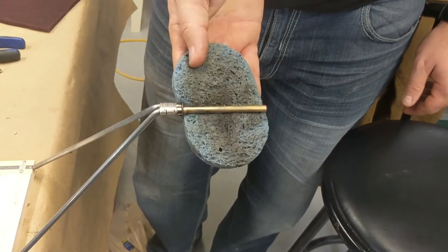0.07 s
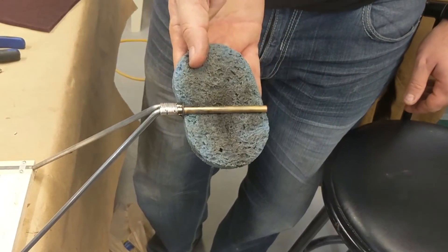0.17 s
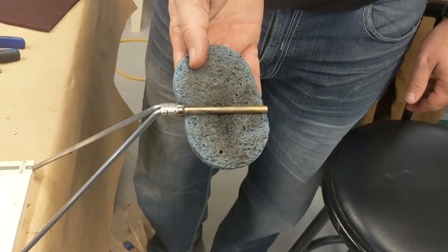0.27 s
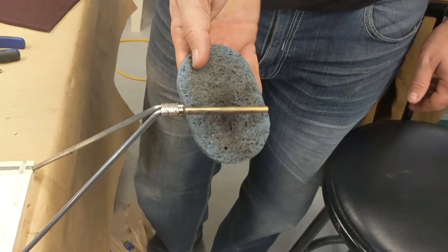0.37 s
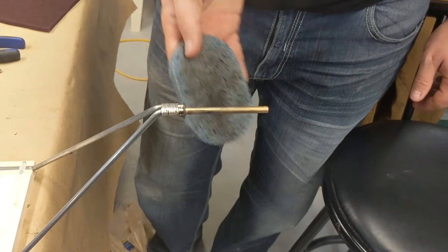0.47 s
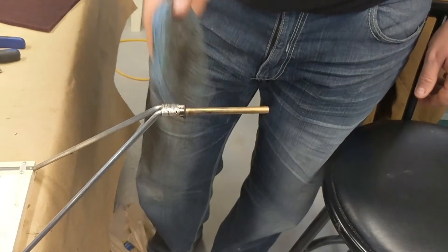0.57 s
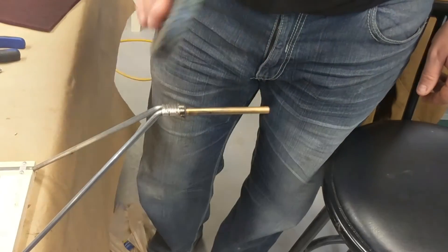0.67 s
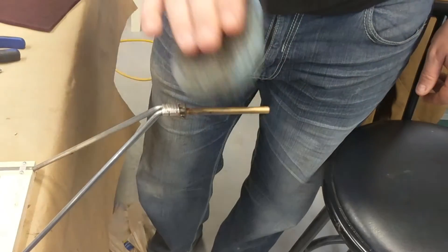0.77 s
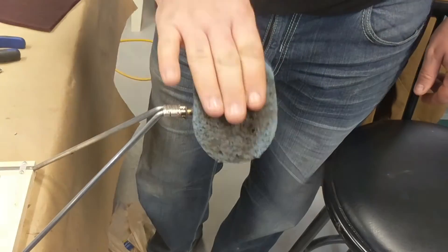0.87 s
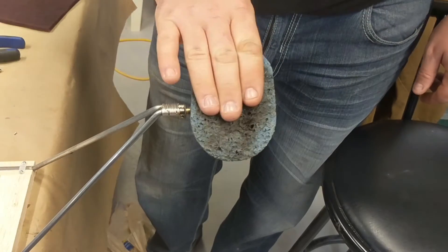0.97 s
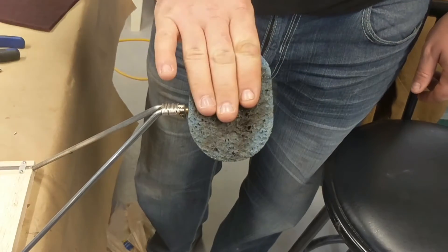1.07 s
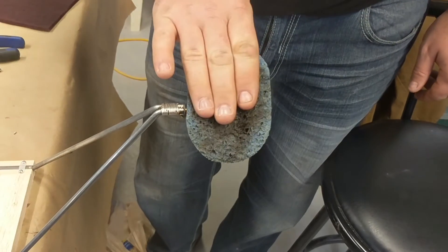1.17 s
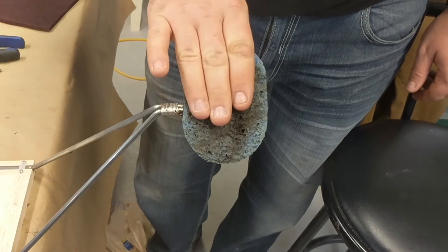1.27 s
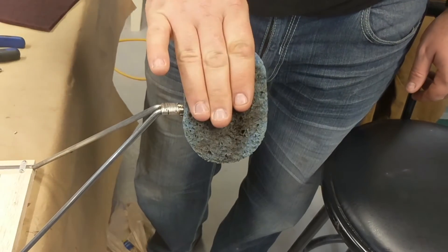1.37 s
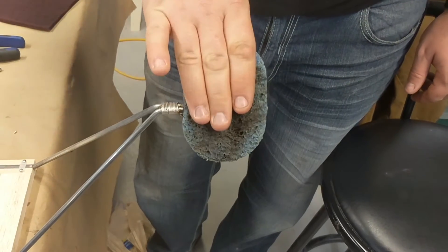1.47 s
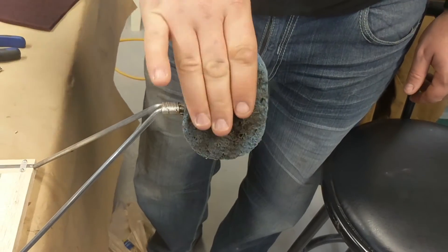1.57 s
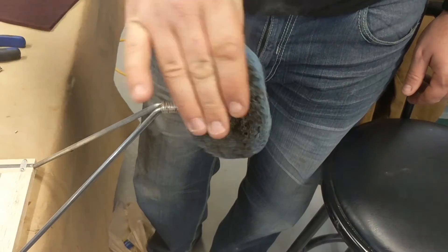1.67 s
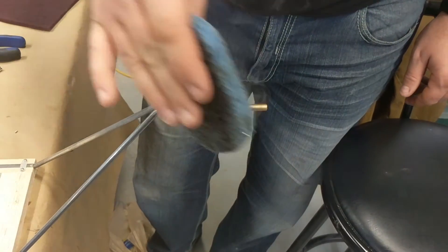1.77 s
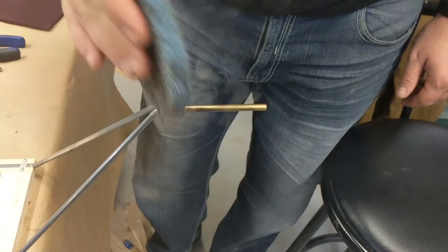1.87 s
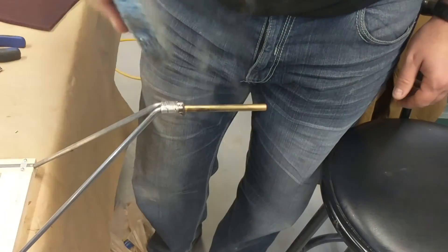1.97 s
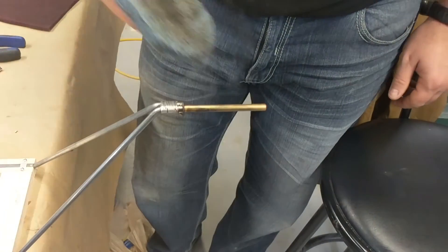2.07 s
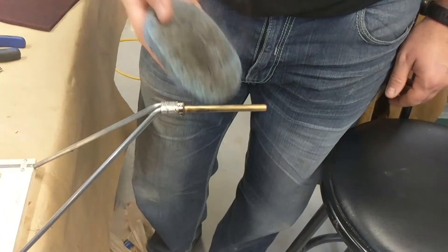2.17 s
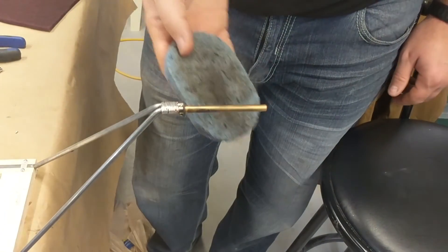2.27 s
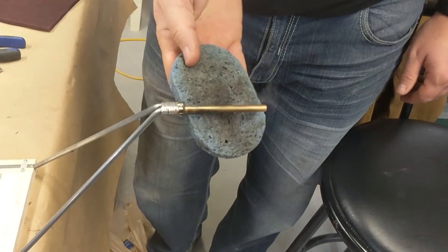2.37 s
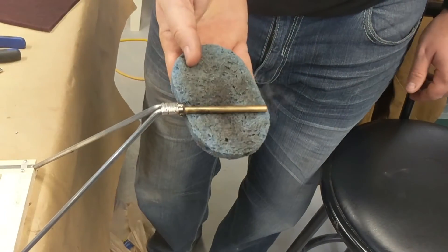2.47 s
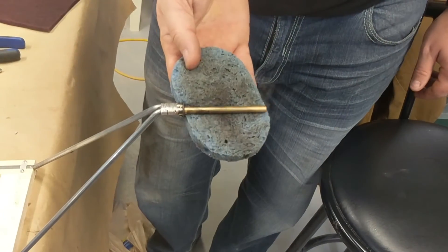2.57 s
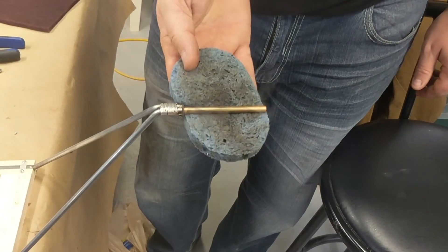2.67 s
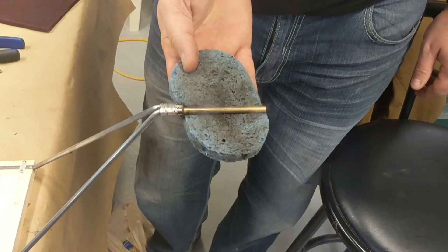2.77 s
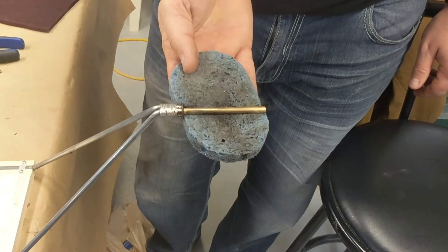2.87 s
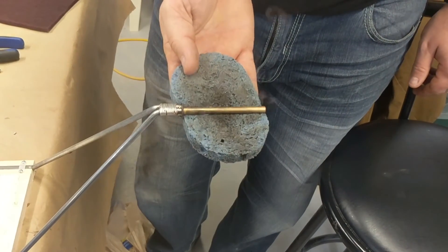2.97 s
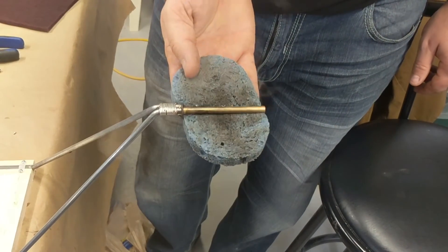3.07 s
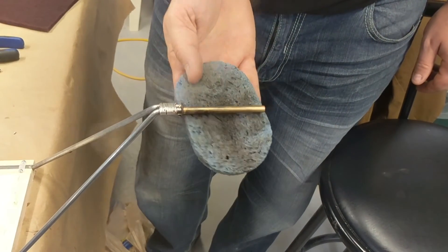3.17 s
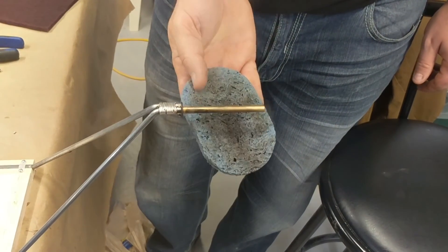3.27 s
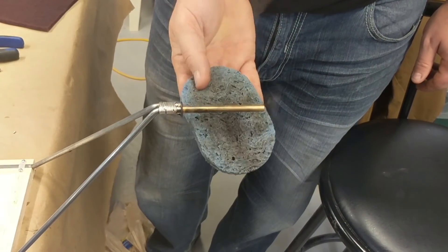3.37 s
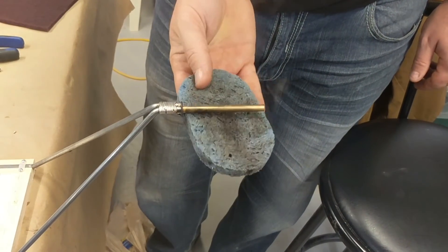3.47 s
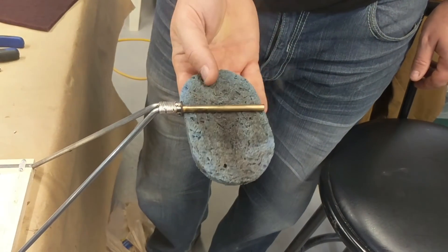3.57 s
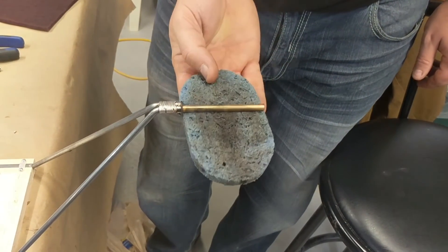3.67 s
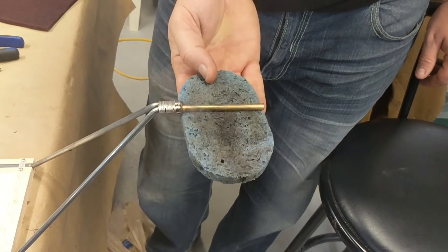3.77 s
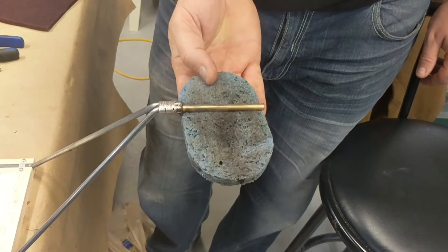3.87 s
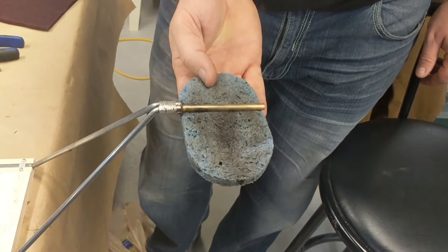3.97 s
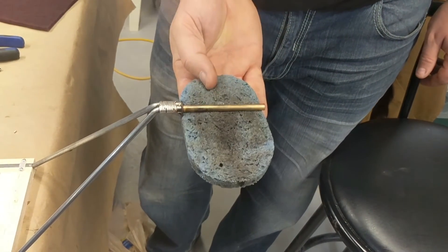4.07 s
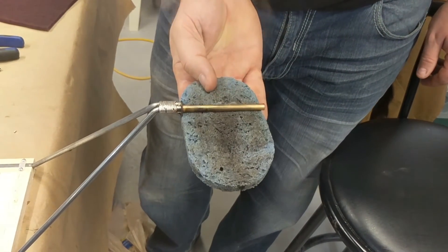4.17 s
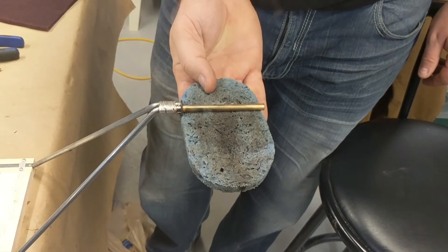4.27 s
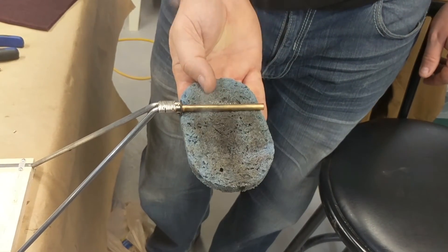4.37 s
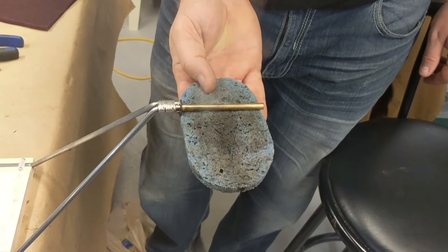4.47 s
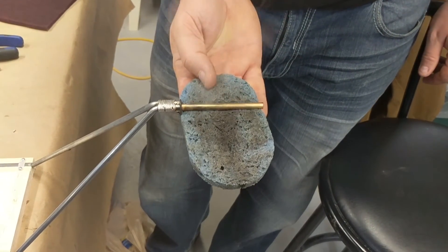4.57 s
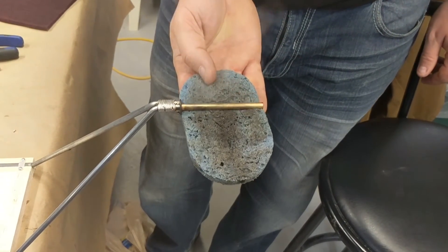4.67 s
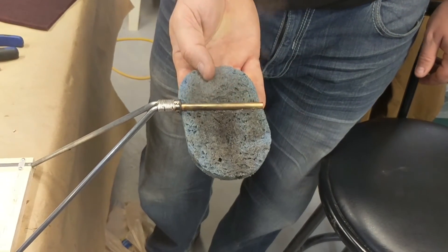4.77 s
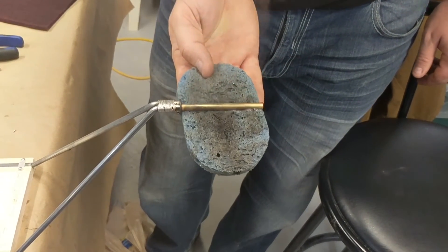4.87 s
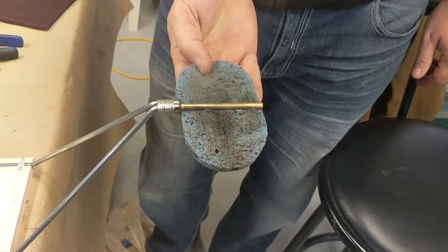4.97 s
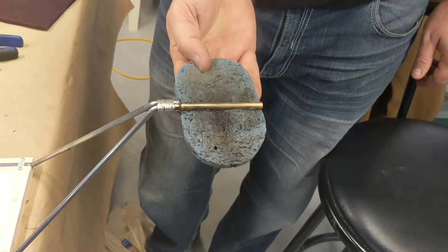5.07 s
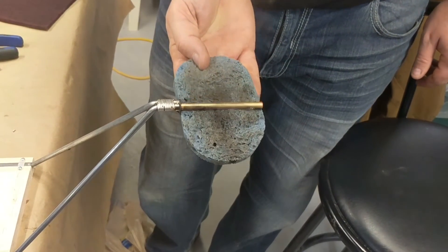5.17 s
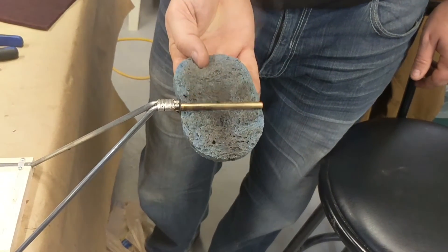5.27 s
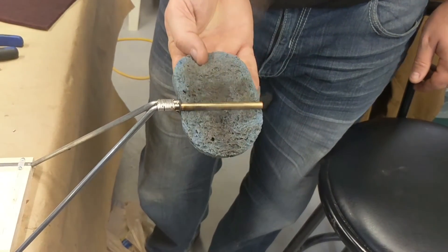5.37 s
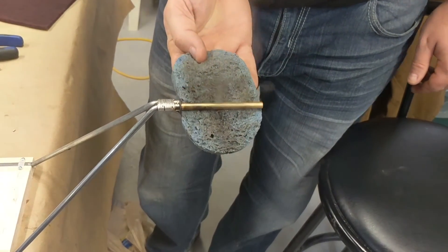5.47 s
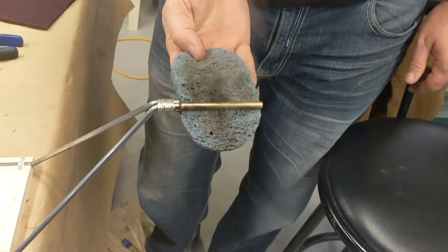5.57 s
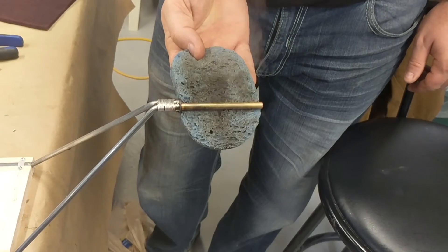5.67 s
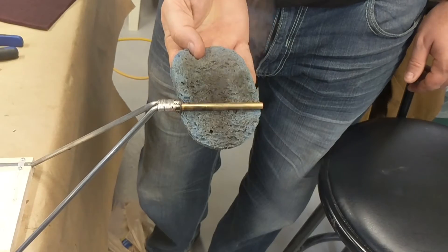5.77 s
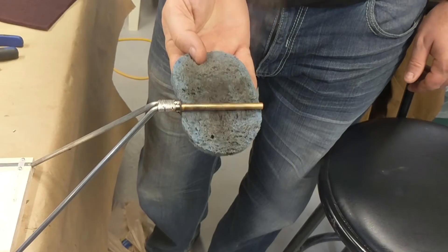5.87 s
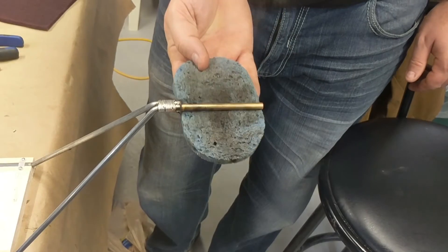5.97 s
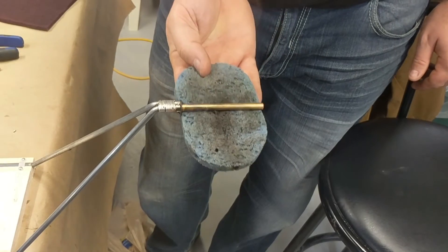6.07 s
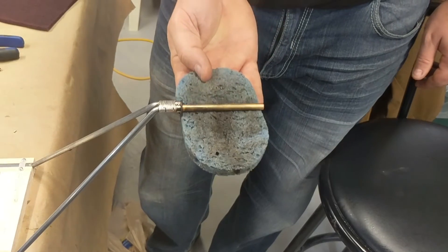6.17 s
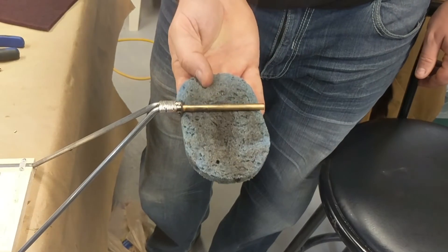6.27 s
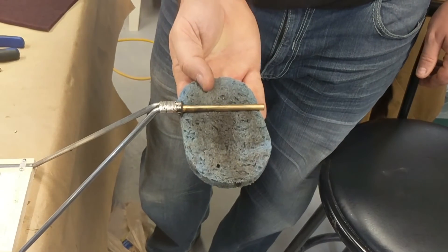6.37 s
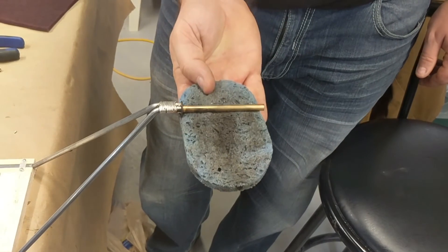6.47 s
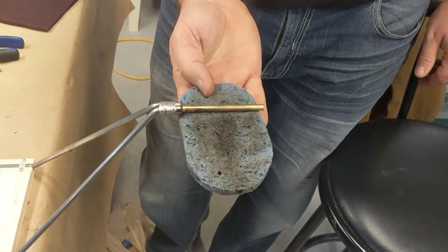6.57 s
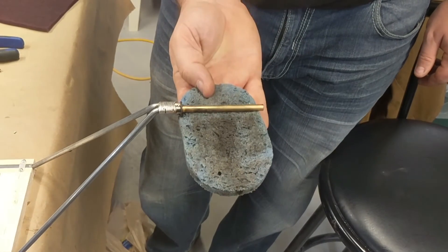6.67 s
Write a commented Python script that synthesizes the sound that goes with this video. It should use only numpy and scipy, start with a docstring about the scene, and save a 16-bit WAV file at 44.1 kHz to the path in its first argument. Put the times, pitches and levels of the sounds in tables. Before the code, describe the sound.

Water fizzes and spits on hot metal in four presses of a damp sponge, the last one longest, with soft handling between.

```python
"""Wet sponge on hot brass

A wet sponge is held four times to a hot brass tube: from below, from above, then twice from below.
Water flashes into a fizz of bursting bubbles and a softer rush of steam; single drops spit.
Between the presses the hand moves about and last drops tick on the tube, over a workshop's rumble."""
import sys
import numpy as np
from scipy import signal
from scipy.fft import rfft, irfft, next_fast_len
from scipy.io import wavfile
from scipy.ndimage import uniform_filter1d

SR = 44100
rng = np.random.default_rng(int(sys.argv[2]) if len(sys.argv) > 2 else 0)


def wav_record(signal):
    """Record a signal, one row per channel, as 16-bit PCM in the file named by sys.argv[1]."""
    frames = np.transpose(np.atleast_2d(signal))
    bounded = np.clip(frames, -1, 1)
    # unit amplitude maps onto the largest positive 16-bit level
    quanta = np.round(bounded * 32767).astype(np.int16)
    wavfile.write(sys.argv[1], SR, quanta)


N = 296969
TIME = np.arange(N) / SR


def gain_of(db):
    """Amplitude ratio of a level in decibels."""
    return 10 ** (np.asarray(db) / 20)


def unit_rms(x):
    """Normalisation to unit mean power."""
    return x / np.sqrt(np.mean(x ** 2) + 1e-20)


def at_frequency(points, hz):
    """Linear interpolation on a logarithmic frequency axis."""
    point_hz, value = np.transpose(points)
    return np.interp(np.log(hz + 1), np.log(point_hz + 1), value)


def at_time(rows, t, column=1):
    """Linear interpolation of one column in time."""
    rows = np.array(rows)
    return np.interp(t, rows[:, 0], rows[:, column])


def colour(x, spectrum):
    """Spectral shaping of a steady sound, returned at rms 1."""
    size = next_fast_len(N)
    response = gain_of(at_frequency(spectrum, np.fft.rfftfreq(size, 1 / SR)))
    return unit_rms(irfft(rfft(x, size) * response, size)[:N])


def resonance(hz, centre_hz, width_hz, peak_db):
    """A resonance as a Lorentzian peak on the decibel scale."""
    return peak_db / (1 + (2 * (hz - centre_hz) / width_hz) ** 2)


def wander(per_s):
    """Random modulation of rms 1 that takes per_s new values a second."""
    return unit_rms(np.interp(TIME * per_s, np.arange(8192), rng.standard_normal(8192)))


def swells(rows):
    """Superposition of Gaussian pulses."""
    return sum(height * np.exp(-((TIME - time_s) / half_s) ** 2) for time_s, half_s, height in rows)


# Standing waves of the workshop: centre_hz, width_hz, peak_db
ROOM_MODES = [(57.5, 6.1, 9), (69, 7.9, 7), (89.6, 11, 3.5), (112.2, 3.4, 11), (140.2, 6.4, -2.5),
              (144.7, 14.3, 9.5), (161, 5.3, -2.5), (193, 13, 1.5), (210, 13, 4), (238.6, 6.7, 7.5),
              (294, 8.5, 10), (305.6, 5.2, 12.5), (330.6, 3.8, 12), (500, 8, 4), (553, 4.9, 9.5)]
# Spectrum of the ventilation: frequency_hz, relative_db
RUMBLE_SPECTRUM = [(20, -41), (42, -14), (60, -3.5), (100, -6.5), (145, -3.5), (180, -6.5), (230, -12),
                   (300, -20.5), (380, -23), (520, -24), (1200, -28.5), (3000, -36.5), (7000, -43.5),
                   (16000, -44)]


def ventilation(level_db=-48.5):
    """Forced vibration: low ventilation noise keeps the modes of the room ringing."""
    size = next_fast_len(N)
    hz = np.fft.rfftfreq(size, 1 / SR)
    modes_db = sum(resonance(hz, *mode) for mode in ROOM_MODES)
    drone = irfft(rfft(rng.standard_normal(size)) * gain_of(modes_db))
    return gain_of(level_db) * colour(drone[:N], RUMBLE_SPECTRUM)


# Contacts of sponge and tube; the press from above has two rows, a light rest and a push:
# start_s, end_s, closing_s, lifting_s, boil_db, boil_db_per_s, steam_ratio_db, ratio_db_per_s
PRESSES = [(-.05, 0.354, .03, 0.081, -41.5, -9.5, -9.5, -4.5),
           (0.816, 2.004, 0.25, 0.53, -46.5, 0, -7.5, -0.5), (1.21, 1.71, 0.051, 0.18, -51, 4, -19.5, 17),
           (2.402, 3.221, 0.035, 0.054, -38, -2.5, -10.5, -3),
           (3.487, 6.9, 0.17, .06, -37.5, -0.04, -12, 1.5)]
# The hand squeezes (+) or eases (-): time_s, half_length_s, change_db
SQUEEZES = [(.21, 0.032, 2.8), (1.75, 0.061, -5.5), (2.63, .06, 1), (2.8, .05, -0.5), (3.7, 0.1, 0.5),
            (3.88, 0.068, -1.3), (4.04, 0.054, 0.5), (4.47, 0.042, -0.5), (4.64, 0.067, 1.3),
            (5.08, 0.093, 1.4), (5.48, 0.044, -0.5), (5.94, 0.074, -3.5), (6.17, 0.03, 0.5),
            (6.33, 0.066, 0.9), (6.47, .03, -1.8)]


def pressing(steam_lag_s=0.05, steam_squeeze_share=0.74):
    """Contact heating: the envelopes of boiling and steam follow wetted area and hand pressure."""
    boil, steam = np.zeros((2, N))
    for start, end, closing, lifting, boil_db, boil_slope, ratio_db, ratio_slope in PRESSES:
        age = np.clip(TIME - start, 0, end - start)
        area = np.clip(np.minimum(age / closing, (end - TIME) / lifting), 0, 1)
        level = area * gain_of(boil_db + boil_slope * age)
        boil += level
        steam += level * gain_of(ratio_db + ratio_slope * age) * (1 - np.exp(-age / steam_lag_s))
    squeeze_db = swells(SQUEEZES)
    return boil * gain_of(squeeze_db), steam * gain_of(steam_squeeze_share * squeeze_db)


def bubbles(per_s, spread_db, smooth_share):
    """Shot noise: bursts of uneven size over the smooth hiss of those too small to tell apart."""
    sizes = gain_of(spread_db * np.minimum(rng.exponential(1, N), 5))
    bursts = sizes * rng.choice([-1., 1.], N) * (rng.random(N) < per_s / SR)
    return np.sqrt(1 - smooth_share) * unit_rms(bursts) + np.sqrt(smooth_share) * rng.standard_normal(N)


# Spectra of bursting bubbles and of escaping steam: frequency_hz, relative_db
FIZZ_SPECTRUM = [(1200, -30), (2600, -8), (4000, -6), (5200, -2.5), (7600, -0.5), (9500, -1.5),
                 (11500, -1.5), (13500, 2), (15600, 2.5), (16200, -8)]
STEAM_SPECTRUM = [(250, -37), (500, -8), (750, -7.5), (1000, -3), (1350, -5.5), (1900, 1.5), (2450, 2),
                  (3300, 1.1), (4500, 1.5), (8000, -28)]
# How tightly the sponge closes over the tube: time_s, cover_fraction
COVER = [(.8, 0), (.9, 1), (1.15, 0.46), (1.3, 0.9), (1.6, 1), (1.75, 0.44)]


def boiling(boil, steam, steam_db=-1.2, sputter_db=0.35, surge_db=0.35):
    """Flash boiling: bubbles burst and steam escapes as broadband noise, filtered by the sponge."""
    cover = at_time(COVER, TIME)
    muffled = np.clip(2 * cover, 0, 1)  # the covering sponge swallows the sharp bursts
    crackle = bubbles(per_s=6000, spread_db=3.5, smooth_share=0.64)
    fizz = np.sqrt(1 - muffled) * crackle + np.sqrt(muffled) * rng.standard_normal(N)
    rush = bubbles(per_s=2200, spread_db=3, smooth_share=0.67)
    hiss = boil * colour(fizz, FIZZ_SPECTRUM) + gain_of(steam_db) * steam * colour(rush, STEAM_SPECTRUM)
    hiss *= gain_of(sputter_db * wander(220) + surge_db * wander(35))  # water arrives unevenly
    hz, t, spectra = signal.stft(hiss, SR, nperseg=512, noverlap=384)
    hz = hz[:, None]
    shape_db = bubble_size_db(hz, t, boil, steam) + pores_db(spectra.shape)
    shape_db += hollow_db(hz, at_time(COVER, t)) + gaps_db(hz, t)
    spectra = spectra * gain_of(shape_db) * sponge_reflection(hz, t)
    return signal.istft(spectra, SR, nperseg=512, noverlap=384)[1][:N]


def bubble_size_db(hz, t, boil, steam, coarsening=0.71, neutral_db=-8):
    """Larger bubbles sound lower: more steam coarsens the fizz, drawing it towards 4.5 kHz."""
    steam_ratio_db = 20 * np.log10(np.interp(t, TIME, (steam + 1e-9) / (boil + 1e-9)))
    fineness = np.clip(coarsening * (neutral_db - steam_ratio_db), -3, 3)
    return fineness * at_frequency([(1000, 0.61), (4500, -0.74), (11000, 0.45), (15500, 0.91)], hz)


def pores_db(shape, depth_db=1.2):
    """Random modulation: pores open and close, so patches of the spectrum come and go."""
    slow_noise = uniform_filter1d(rng.standard_normal(shape), size=18, axis=1)
    return depth_db * unit_rms(uniform_filter1d(slow_noise, size=4, axis=0))


# The largest drops that burst on the metal: time_s, relative_db
SPITS = [(.189, -31), (.283, -28), (.317, -31), (.522, -45), (.77, -49), (.878, -31), (2.0, -40),
         (2.175, -43), (2.287, -45), (2.586, -19), (2.671, -19), (2.731, -24), (2.845, -20), (2.895, -22),
         (3.122, -26), (3.25, -46), (3.444, -45), (3.478, -45), (5.279, -19), (5.741, -19), (6.439, -22)]


def spits(boil, large_gain_db=2, small_gain_db=16, small_per_s=26, pitch_hz=12000, decay_s=0.00006):
    """Impulsive sources: a bursting drop is one sharp pressure swing; small ones come at random."""
    bursts = (rng.random(N) < small_per_s / SR) * rng.uniform(0.5, 1, N)
    bursts *= gain_of(small_gain_db) * boil
    for time_s, relative_db in SPITS:
        bursts[round(time_s * SR)] += gain_of(relative_db + large_gain_db)
    t = np.arange(-32, 33) / SR
    swing = np.sin(2 * np.pi * pitch_hz * t) * np.exp(-abs(t) / decay_s)
    return np.convolve(bursts, swing, "same")


# Rubs of hand and sleeve as the sponge is turned over: time_s, half_length_s, relative_db
RUBS = [(0.31, 0.1, -63), (0.593, 0.051, -61), (0.71, 0.022, -56), (0.778, .03, -62.5), (.915, 0.056, -58),
        (1.17, 0.071, -61.5), (1.487, 0.064, -58.5), (1.635, 0.046, -57.5), (1.796, 0.074, -57),
        (1.95, 0.048, -60.5), (2.137, .05, -63.5), (2.367, 0.11, -65), (3.19, .025, -65), (3.51, .06, -68)]
# Spectrum of the rubbing: frequency_hz, relative_db
RUB_SPECTRUM = [(250, -7), (600, 0), (1200, 1), (2200, -4.5), (3500, -13.5), (8000, -17), (16000, -26)]


def handling(gain_db=-2, roughness_db=3.5):
    """Friction noise: skin, cloth and sponge rub in soft, uneven swells."""
    envelope = swells([(time_s, half_s, gain_of(db)) for time_s, half_s, db in RUBS])
    envelope *= gain_of(gain_db + roughness_db * wander(60))
    return envelope * colour(rng.standard_normal(N), RUB_SPECTRUM)


# Fresh water meets the metal: time_s, level_db, decay_s, centre_hz
PUFFS = [(0.333, -48, 0.0036, 5500), (.838, -54, 0.018, 9000), (0.87, -48, 0.022, 7000),
         (0.88, -44.5, .0035, 4500), (1.681, -52, .006, 4000), (2.0, -60, .006, 7000),
         (2.671, -38.5, 0.0028, 3530), (3.439, -53.5, 0.0036, 3000), (3.502, -56, .012, 11000)]


def puffs(rise_s=0.0012):
    """Sudden vaporisation: fresh water flashes into a short, broadband burst of steam."""
    out, noise = np.zeros(N), rng.standard_normal(N)
    for time_s, level_db, decay_s, hz in PUFFS:
        envelope = np.exp(-np.maximum((time_s - TIME) / rise_s, (TIME - time_s) / decay_s))
        spectrum = [(hz / 12, -11), (hz / 2, -3), (hz, 0), (hz * 2, -8)]
        out += gain_of(level_db) * envelope * colour(noise, spectrum)
    return out


def drying(prickle_db=-67, dry_s=0.17, tick_db=-42, ticks_per_s=30, drag_s=0.3):
    """Evaporation: the film left by a press prickles and ticks as it dries; a slow lift leaves less."""
    wetness = sum((TIME > end) * np.exp(-abs(TIME - end) / dry_s - lifting / drag_s)
                  for _, end, _, lifting, *_ in PRESSES)
    prickle = bubbles(per_s=900, spread_db=3, smooth_share=0.3)
    prickle = colour(prickle, [(1500, -40), (5000, 3), (11000, 0), (16000, 1.5)])
    impulses = 1. * (rng.random(N + 2) < ticks_per_s / SR)
    ticks = np.diff(impulses, n=2) / 2  # differencing leaves mostly treble
    return gain_of(prickle_db) * wetness * prickle + gain_of(tick_db) * np.sqrt(wetness) * ticks


# Peaks and dips of the hollow under the sponge: centre_hz, width_hz, peak_db
HOLLOW_MODES = [(1200, 690, 8), (2720, 550, -4), (3220, 170, 3.5), (3700, 870, -4), (4100, 300, 1.5),
                (4940, 160, 1), (7000, 900, -1.5), (8300, 250, 1), (9900, 400, 2.5)]


def hollow_db(hz, cover, muffling_db=-1.1):
    """Cavity resonance and absorption: the covering sponge colours the hiss and dulls its treble."""
    modes_db = sum(resonance(hz, *mode) for mode in HOLLOW_MODES)
    return cover * (muffling_db * (1 + hz / 9000) + modes_db)


# Gaps between sponge and metal: start_s, length_s, first_hz, last_hz, width_hz, peak_db
GAPS = [(0.86, 0.18, 5250, 5200, 420, 14), (.98, .32, 5300, 5150, 300, 3),
        (0.98, .23, 5700, 5700, 380, 7.5), (0.94, 0.44, 8350, 8400, 300, 8.5),
        (0.98, 0.71, 2200, 2030, 240, 8), (1.4, 0.29, 5550, 5500, 600, 3), (2.4, .95, 2140, 2900, 550, 3.5),
        (3.5, 3, 2840, 2250, 640, 4), (6.107, 1.1, 2730, 3200, 700, 2.5)]


def gaps_db(hz, t, skew=0.62):
    """Flow-excited resonance: steam sings in each gap until it closes."""
    total_db = 0
    for start_s, length_s, first_hz, last_hz, width_hz, peak_db in GAPS:
        progress = np.clip((t - start_s) / length_s, 0, 1)
        opening = np.sin(np.pi * progress ** skew)  # skew below 1 opens faster than it closes
        centre_hz = first_hz + (last_hz - first_hz) * progress
        total_db += resonance(hz, centre_hz, width_hz, peak_db * opening)
    return total_db


# Echo off the sponge as it lifts: time_s, delay_s, amplitude_ratio
SPONGE_ECHO = [(1.6, 0.00076, 0.03), (1.72, 0.00073, 0), (1.85, 0.00081, 0.25), (2.0, .0011, .1),
               (2.1, .0011, 0)]


def sponge_reflection(hz, t):
    """Comb filtering: the hiss interferes with its reflection off the lifting sponge."""
    delay_s = at_time(SPONGE_ECHO, t)
    strength = at_time(SPONGE_ECHO, t, column=2)
    return 1 + strength * np.exp(-2j * np.pi * hz * delay_s)


# Reverberation time of the workshop: frequency_hz, t60_s
REVERB_TIMES = [(200, 0.54), (2000, 0.36), (8000, 0.14), (16000, 0.11)]


def room(x, tail_db=-17, bench_db=-15, bench_delay_s=0.0043):
    """Reverberation: one dull reflection off the bench, then a faint tail whose treble dies first."""
    hz, t, spectra = signal.stft(rng.standard_normal(SR // 2), SR, nperseg=256)
    decay = gain_of(-60 * t / at_frequency(REVERB_TIMES, hz)[:, None]) * (t > 0.004)
    response = signal.istft(spectra * decay, SR, nperseg=256)[1]
    tail = signal.fftconvolve(x, response / np.linalg.norm(response))[:N]
    bench = signal.lfilter([0.4], [1, -0.6], np.interp(TIME - bench_delay_s, TIME, x))
    return x + gain_of(bench_db) * bench + gain_of(tail_db) * tail


def scene():
    """Superposition: all sources add at one point, alike in both channels."""
    boil, steam = pressing()
    direct = boiling(boil, steam) + spits(boil) + puffs() + drying() + handling()
    mono = room(direct) + ventilation()
    return np.array([mono, mono])


def record(dry):
    """Band limiting: a steep low-pass filter removes the highest treble."""
    cutoff_hz = 15850
    low_pass = signal.firwin(611, cutoff_hz, window=("kaiser", 8), fs=SR)
    return signal.oaconvolve(dry, low_pass[None], "same", axes=1)


dry = scene()
out = record(dry)
wav_record(out)
```